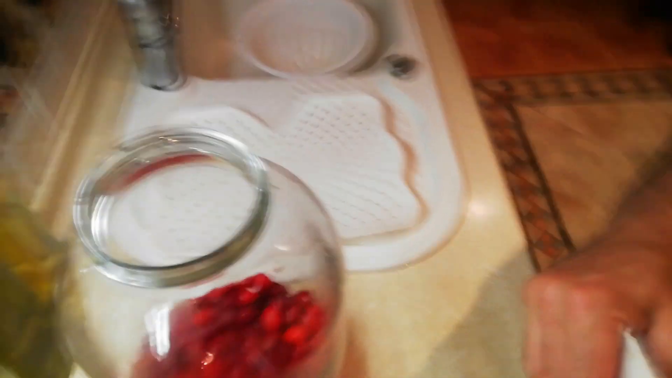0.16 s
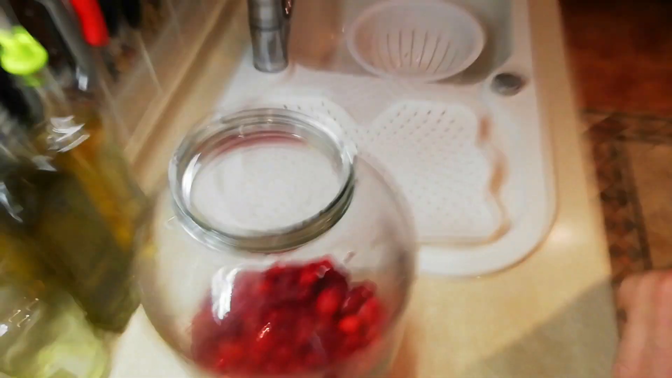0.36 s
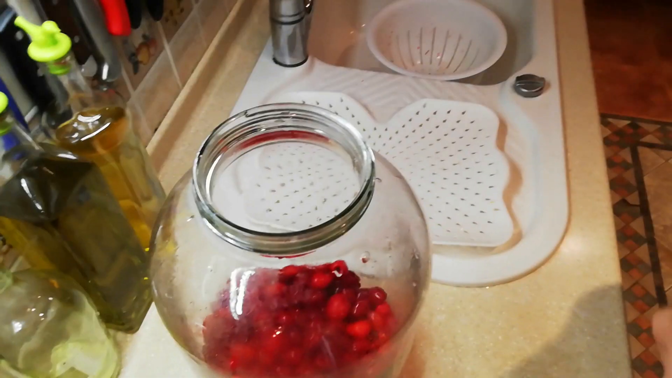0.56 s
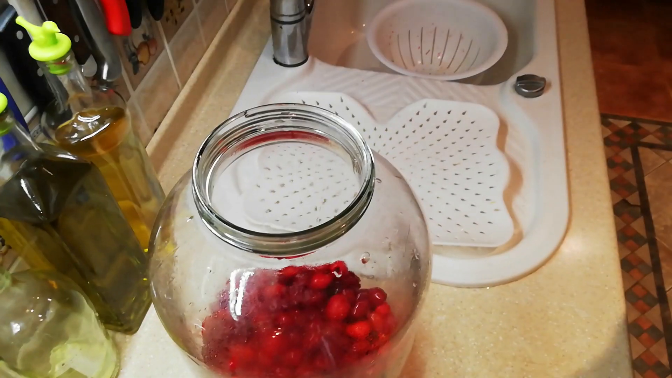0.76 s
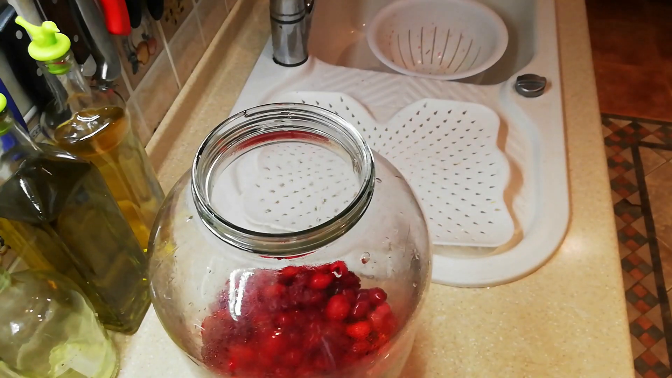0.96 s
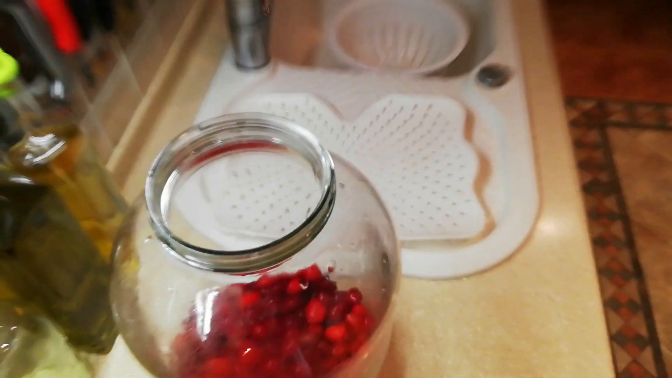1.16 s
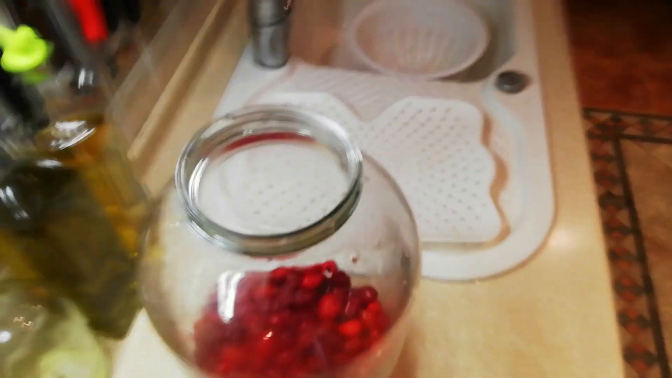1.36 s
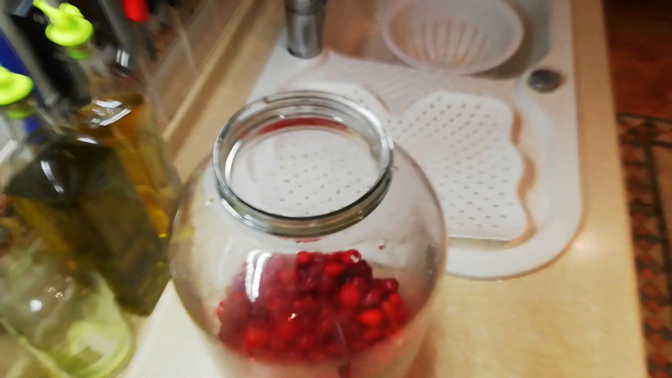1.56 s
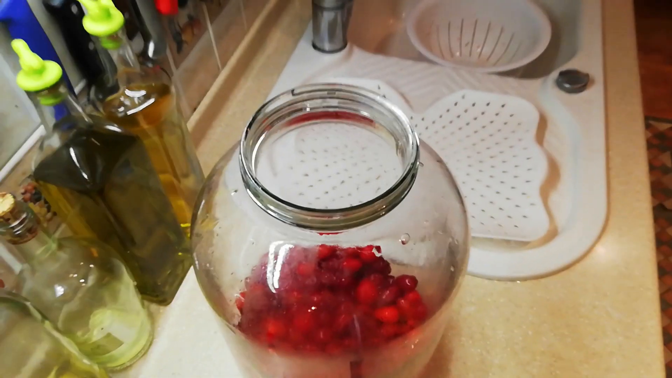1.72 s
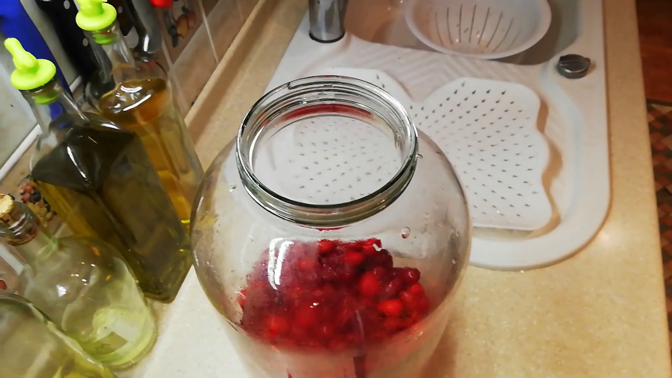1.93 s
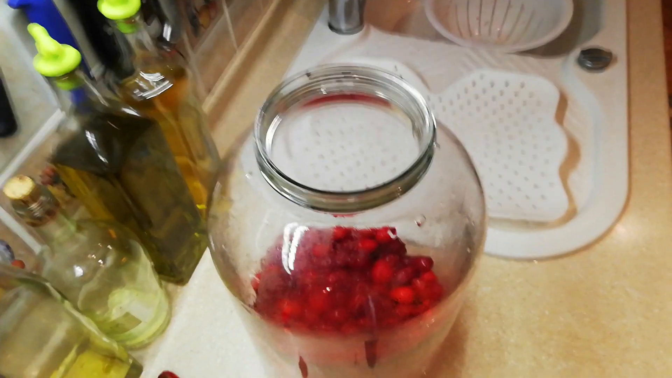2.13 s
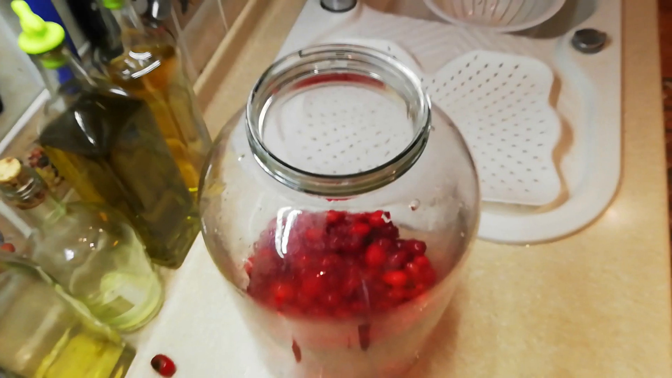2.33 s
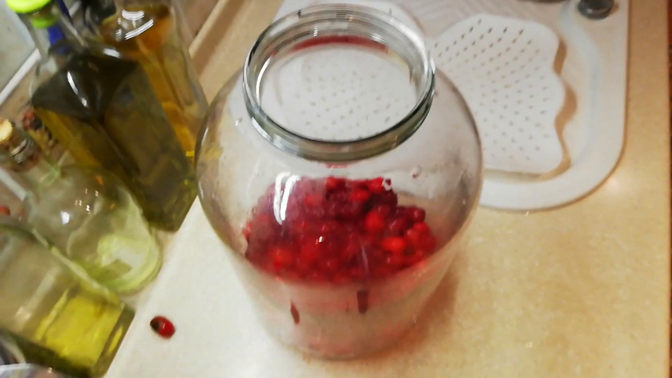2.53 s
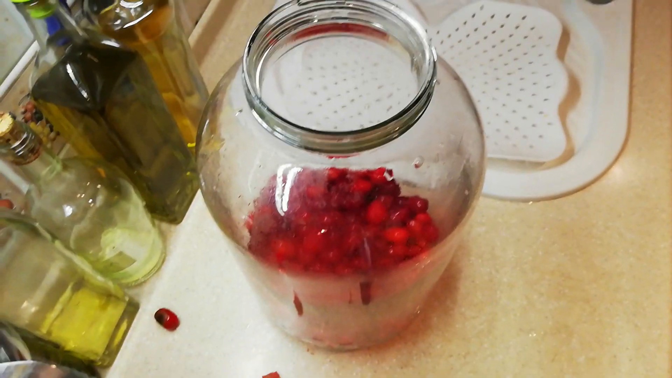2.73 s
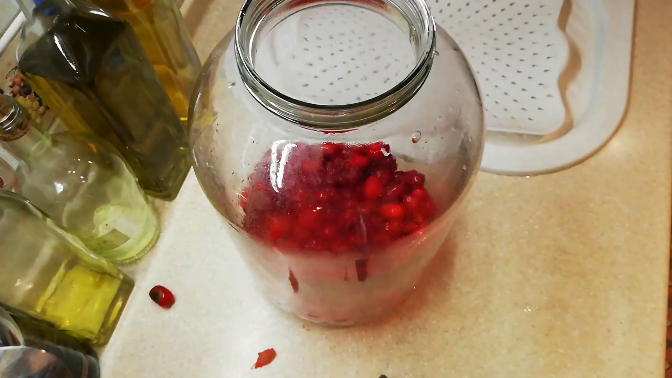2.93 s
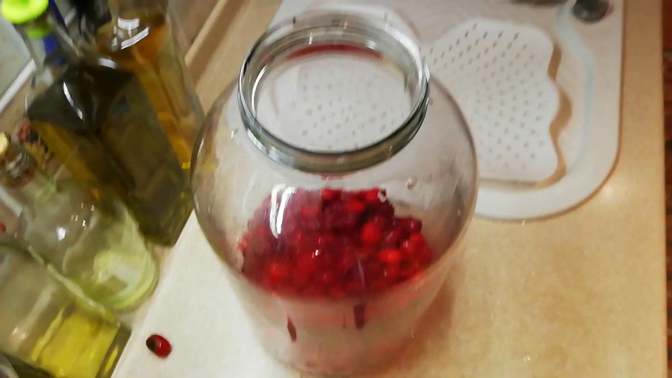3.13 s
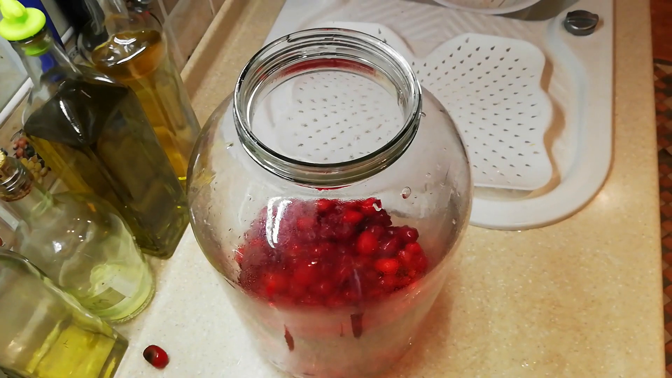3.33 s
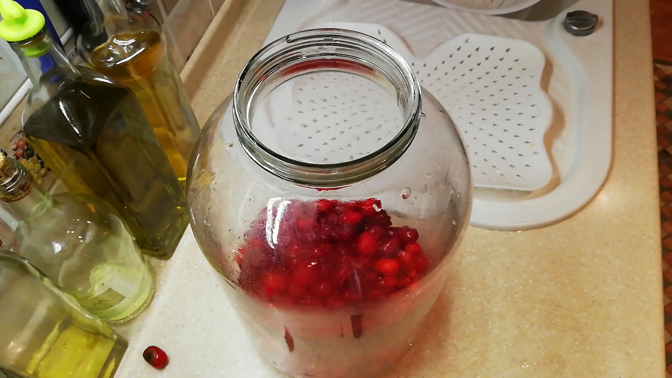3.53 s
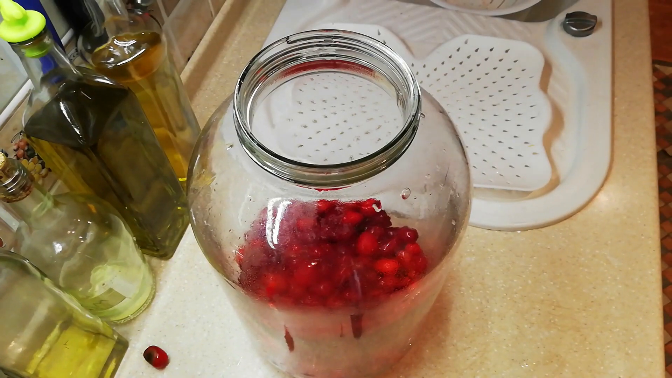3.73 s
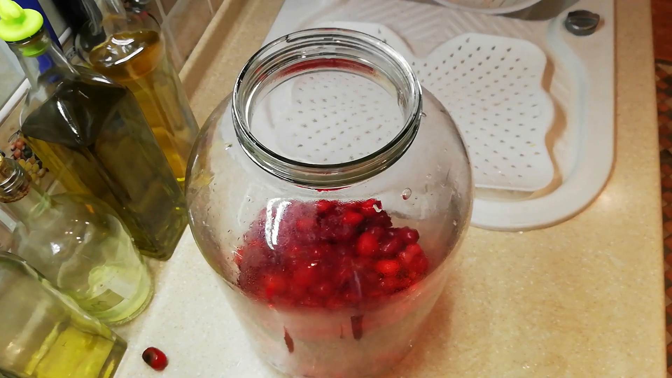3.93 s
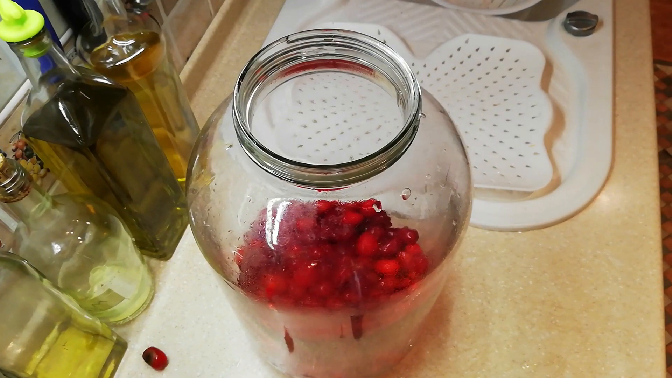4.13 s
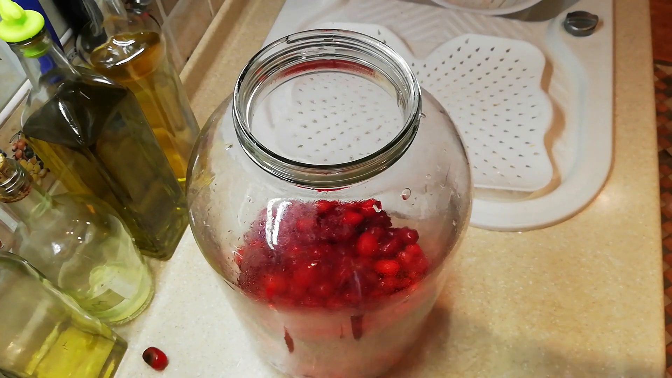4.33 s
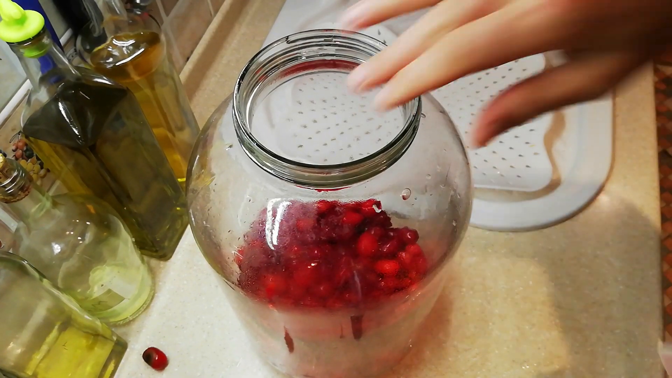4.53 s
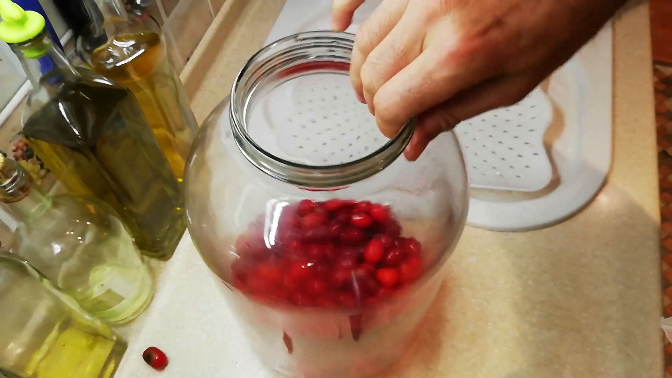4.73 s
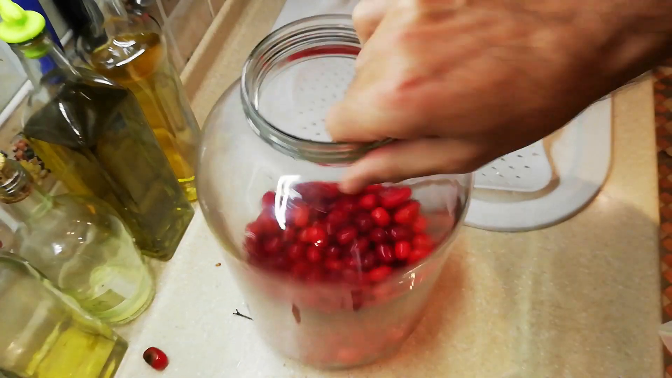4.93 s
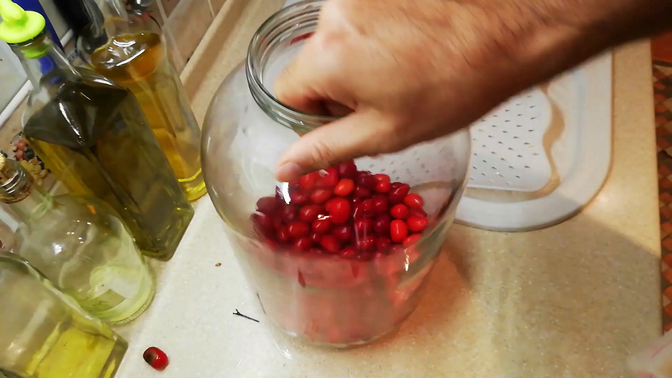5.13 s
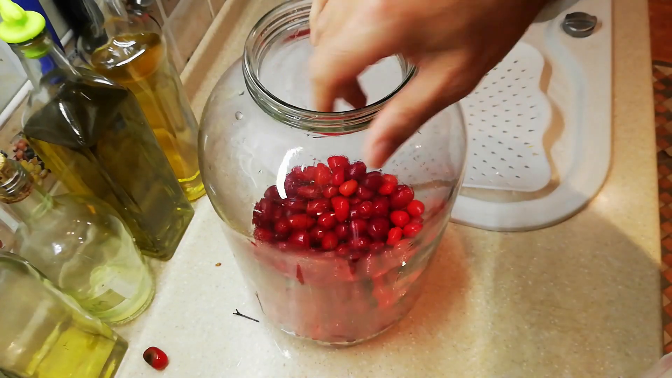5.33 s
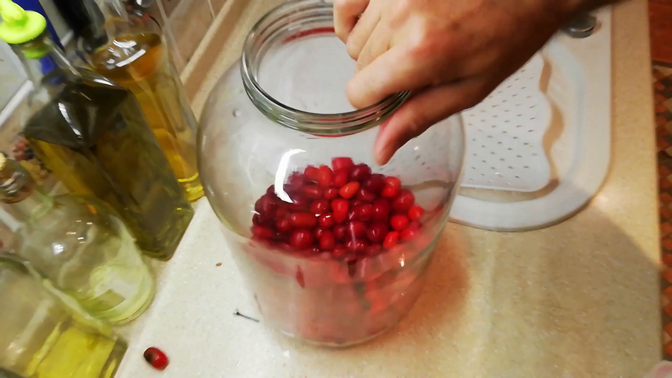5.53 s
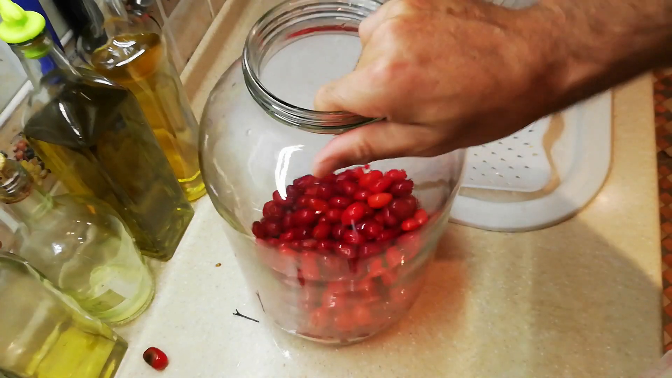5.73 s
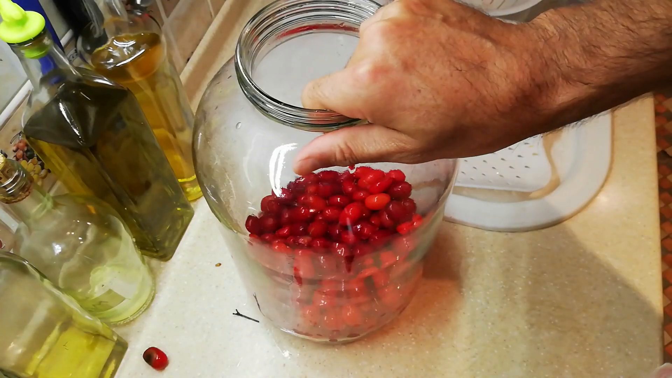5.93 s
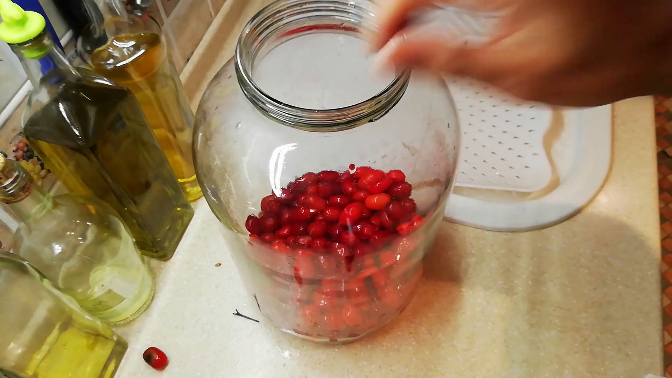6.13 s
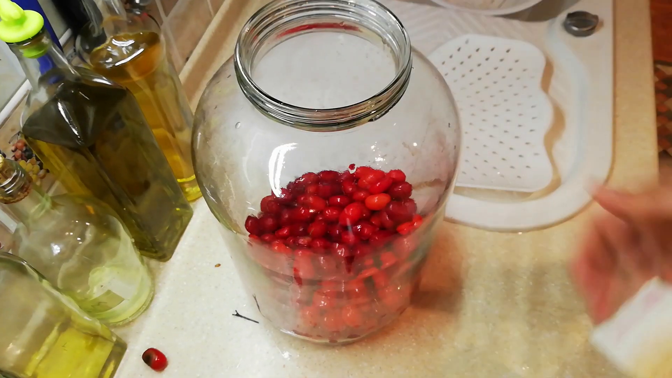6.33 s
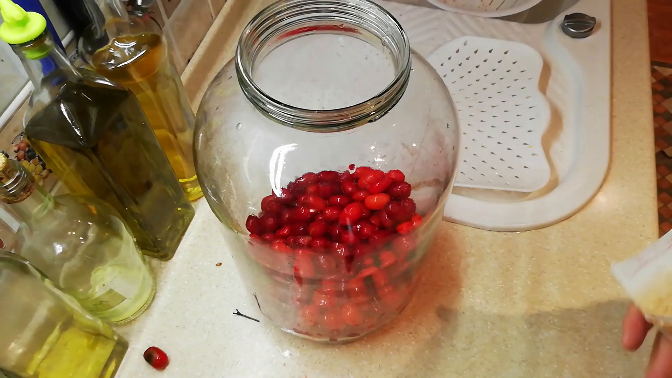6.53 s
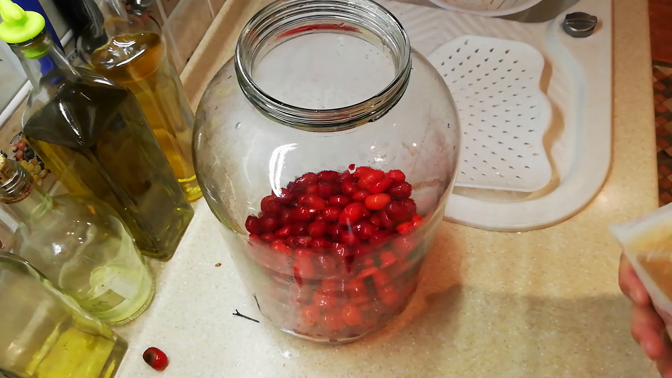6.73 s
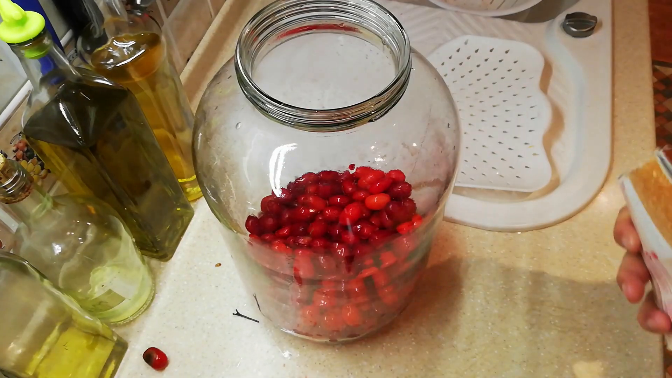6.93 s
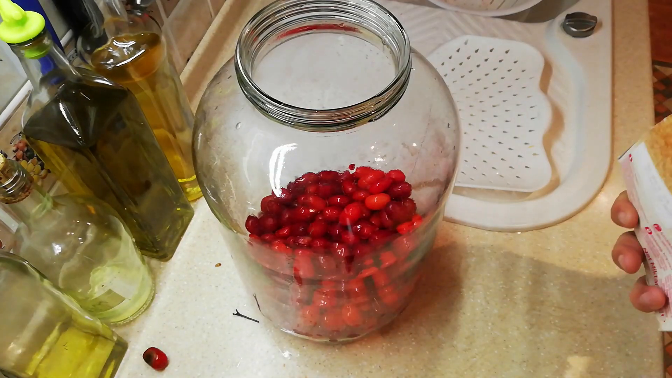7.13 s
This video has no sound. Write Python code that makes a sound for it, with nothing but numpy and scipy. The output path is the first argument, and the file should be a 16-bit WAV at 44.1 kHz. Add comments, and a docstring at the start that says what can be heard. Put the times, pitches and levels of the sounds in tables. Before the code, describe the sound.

For the first second and a half a paper package rustles softly, with a few crisp creases, while the grip ticks and rumbles right at the stereo microphone. Soft thumps follow, and a dish is bumped at 1.5 seconds and set down with a short ring at 1.8. Two sharp clacks come at 2.3 and 2.5, then a lull with faint knocks and rustles. From 4.6 a big glass jar slides over a gritty counter in a swelling scrape. Berries thud inside it at 4.8 and, loud and hollow, at 5.3. A shorter scrape with a tiny finger squeak leads to another strong thud at 5.8. Around 6.2 the glass chatters briefly to rest. From 6.5 to the end, near 7.4, the paper rustles and crackles again, louder. Everything is close, in a small kitchen with faint air and a distant motor hum.

```python
"""A big glass jar of berries, lifted and shaken to and fro above a kitchen counter, close to a hand-held
camera. The berries roll and grind over the glass, thud against its wall, and the glass chatters to rest. Before
that a paper package rustles, hard things clack and a dish is set down; at the end the paper rustles again. The
grip ticks and rumbles right at the stereo microphone; room air and a far motor lie behind."""
import sys
import numpy as np
from scipy import signal
from scipy.fft import rfft, irfft
from scipy.io import wavfile
from scipy.ndimage import uniform_filter1d

SR = 44100
rng = np.random.default_rng(int(sys.argv[2]) if len(sys.argv) > 2 else 0)


def master(y):
    """Save y as 16-bit WAV."""
    cut = np.clip(np.atleast_2d(y).T, -1, 1)
    pcm = np.round(cut * 32767)  # scale
    wavfile.write(sys.argv[1], SR, pcm.astype(np.int16))


N = 320362
TIME = np.arange(N) / SR
BASS, BODY, MIDDLE, TREBLE = (25, 300), (400, 2500), (900, 3000), (5000, 15000)  # bands in Hz
RUB_RISE_S, RUB_RELEASE_DB_PER_S = 0.026, 167

# Stereo width of diffuse sound. Each row: frequency in Hz, side against mid in dB.
WIDTH = [(60, -21), (150, -20.5), (280, -7.5), (500, -0.5), (15000, 2)]
# The lower part of a hand rubbing paper or glass. Each row: frequency in Hz, relative level in dB.
RUB_SPECTRUM = [(120, -31), (200, -16), (409, -14), (552, -11), (746, -9), (849, -7), (1260, -5),
                (1410, -5.5), (2470, -10), (4500, -7), (5850, -22), (9900, -120)]
# A dull thump. Each row: frequency in Hz, relative level in dB.
THUD_SPECTRUM = [(25, -54.5), (55, -11.5), (85, -1), (150, 1), (220, -3.5), (290, -5), (390, -5.5),
                 (540, -9.5), (760, -11), (1100, -15), (1850, -19.5), (2500, -33), (3600, -28.5),
                 (7000, -39), (10500, -32.5), (16000, -70.5)]
# Air and walls of the jar. Each row: frequency in Hz, relative level in dB, 60 dB decay in seconds.
JAR_MODES = [(113, -7, .35), (228, -7, .22), (325, -9, .3), (380, 5, .13), (432, -5, .18), (484, -11, .17),
             (624, -14, .22), (755, -6, .2), (1860, -23, .25)]
# The high ring of its glass. Each row: frequency in Hz, relative level in dB, 60 dB decay in seconds.
GLASS_MODES = [(1795, -6.5, 0.34), (2760, -5.5, 0.063), (3163, 2, 0.029), (3750, 1, 0.062),
               (4010, -3, 0.028), (4560, -2.5, 0.049), (5050, -1, 0.018), (5380, 1.5, 0.028),
               (5720, -5, 0.047), (7370, -11, .1), (9840, 1, 0.018), (10740, -7, 0.031)]
# Shakes of the jar. Each row: start and length in seconds, relative level at top speed in dB, # grit against
# body in dB.
SHAKES = [(4.569, 0.68, -34.5, -2.5), (5.575, 0.22, -39, -0.5)]


def amp(db):
    """Decibels to gain."""
    return 10 ** (np.asarray(db) / 20)


def read(points, hz):
    """A curve read on a log-frequency axis."""
    point_hz, value = np.transpose(points)
    return np.interp(np.log(hz + 1), np.log(point_hz + 1), value)


def add(mix, start, sound):
    """Mixes a sound in at a start time in seconds."""
    part = mix[..., max(round(start * SR), 0):][..., :sound.shape[-1]]
    part += sound[..., :part.shape[-1]]


def peaked(x, size=150):
    """Scales the loudest stretch of `size` samples to rms 1."""
    return x / np.sqrt(uniform_filter1d(x ** 2, size).max())


def evened(x, band=(0, SR)):
    """Scales to rms 1 within a band."""
    hz = np.fft.rfftfreq(len(x), 1 / SR)
    in_band = rfft(x)[(hz >= band[0]) & (hz < band[1])]
    return x * len(x) / np.sqrt(2 * np.sum(abs(in_band) ** 2))


def colour(x, spectrum, size=4096):
    """Minimum-phase filter with the given spectrum."""
    hz = abs(np.fft.fftfreq(size, 1 / SR))
    log_gain = np.log(amp(np.maximum(read(spectrum, hz), -100)))
    taps = np.fft.ifft(np.exp(np.conj(signal.hilbert(log_gain)))).real[:size // 2]
    return signal.oaconvolve(x, taps)[:len(x)]


def soften(x, edge_hz):
    """A softer contact loses its treble."""
    return signal.lfilter(*signal.butter(2, min(edge_hz, SR / 2 - 1), fs=SR), x)


def grains(count, per_s, spread_db):
    """Random tiny impacts, a few larger than the rest."""
    size = amp(spread_db * np.minimum(rng.exponential(1, count), 4))
    return size * rng.choice([-1, 1], count) * (rng.random(count) < per_s / SR)


def burst(fade_s, scatter, count=4096):
    """One impulse followed by a dying scatter of smaller ones."""
    trail = rng.standard_normal(count) * np.exp(-np.arange(count) / SR / fade_s)
    return signal.unit_impulse(count) + scatter * trail / np.linalg.norm(trail)


def ring(drive, modes):
    """What a body with these modes gives back, at the power of its drive."""
    t = np.arange(SR // 2) / SR
    tone = sum(amp(db - 60 * t / t60) * np.sin(2 * np.pi * (hz * t + rng.random()))
               for hz, db, t60 in modes)
    ringing = signal.oaconvolve(drive, tone)[:len(drive)]
    return ringing * drive.std() / ringing.std()


def panned(x, pan_db, shadow_hz=350):
    """Places a sound by left minus right in dB; the bass reaches both microphone ports alike."""
    upper = signal.lfilter(*signal.butter(1, shadow_hz, "high", fs=SR), x)
    return x + upper * (amp([[pan_db / 2], [-pan_db / 2]]) - 1)


def diffuse(mid, side):
    """Sound from all around: alike at both ports in the bass, unrelated in the treble."""
    width = amp(read(WIDTH, np.fft.rfftfreq(len(mid), 1 / SR)))
    left_right = rfft(mid) + np.array([[1], [-1]]) * width * rfft(side)
    return irfft(left_right / np.sqrt(1 + width ** 2), len(mid))


def friction(spectrum, band, per_s, spread_db):
    """Dense coloured grains spread over both ports, rms 1 within the band."""
    return diffuse(*(evened(colour(grains(N, per_s, spread_db), spectrum), band) for _ in range(2)))


def wander(x, patchy_db, patch_frames=16, patch_bins=5):
    """The colour of a rubbing contact shifts as it moves over the surface."""
    spectra = signal.stft(x, nperseg=512)[2]
    patches = uniform_filter1d(rng.standard_normal(spectra.shape[1:]), patch_bins, 0)
    patches = uniform_filter1d(patches, patch_frames, 1)
    shifted = signal.istft(spectra * amp(patchy_db * patches / patches.std()), nperseg=512)[1][:, :N]
    return shifted * x.std() / shifted.std()


def stroke(start, length, rise_s, release_db_per_s):
    """Gain of one hand movement: attack, hold, release."""
    t = np.maximum(TIME - start, 0)
    return np.minimum(t / rise_s, 1) * amp(-release_db_per_s * np.maximum(t - length, 0))


def kitchen(x, near_db, tail_db, near_s=0.0049, count=20000):
    """Direct sound, quick reflections off counter and tiles, and the tail of the room."""
    # Reverberation of the room. Each row: frequency in Hz, 60 dB decay in seconds.
    decay_times = [(150, 0.53), (400, 0.4), (1000, 0.32), (3000, 0.4), (8000, 0.33), (15000, 0.19)]
    t = np.arange(count) / SR
    near = rng.standard_normal((2, count)) * np.exp(-t / near_s) * (t > .0007)
    hz, frame_s, spectra = signal.stft(rng.standard_normal((2, count)) * (t > .006), SR, nperseg=256)
    decay = amp(-60 * frame_s / read(decay_times, hz)[:, None])
    tail = signal.istft(spectra * decay, SR, nperseg=256)[1][:, :count]
    echo = amp(near_db) * near / np.linalg.norm(near[0]) + amp(tail_db) * tail / np.linalg.norm(tail[0])
    return x + signal.fftconvolve(np.atleast_2d(x), diffuse(*echo), axes=1)[:, :N]


def room_tone(air_db=-54.5):
    """Quiet air all around and the hum of a far motor."""
    # Room air. Each row: frequency in Hz, relative level in dB.
    air_spectrum = [(12, -34.5), (20, 2.5), (67, -1), (154, -17.5), (228, -30.5), (328, -12), (377, -19.5),
                    (624, -24), (1120, -20), (2320, -31), (4540, -32), (7310, -34), (9950, -31.5),
                    (16000, -47.5)]
    # The motor's tones. Each row: frequency in Hz, level in dB.
    motor_tones = [(328.4, -75.5), (1055, -84), (2552, -94)]
    air = diffuse(*(evened(colour(noise, air_spectrum)) for noise in rng.standard_normal((2, N))))
    hum = sum(amp(db) * np.sqrt(2) * np.sin(2 * np.pi * hz * TIME) for hz, db in motor_tones)
    return amp(air_db) * air + hum


def handling(resting_db=-61.5):
    """Hands rumble on the camera and the counter, faintly even at rest."""
    # Handling rumble. Each row: frequency in Hz, relative level in dB.
    spectrum = [(12, -32.5), (20, -7), (87, 1.5), (156, -9), (215, -5), (286, -19), (325, -11.5),
                (687, -32), (900, -21), (1170, -37), (1980, -120)]
    # The hands shift. Each row: start and length in seconds, level in dB.
    shifts = [(0.15, 0.15, -45), (0.252, 0.31, -37.5), (0.897, 0.11, -49.5), (1.176, 0.11, -38.5),
              (1.652, 0.23, -47.5), (4.307, 0.146, -48), (4.695, 0.46, -43.5), (6.139, 0.17, -34.5),
              (7.217, 0.06, -38.5)]
    moving = sum(amp(db) * stroke(start, length, rise_s=0.032, release_db_per_s=118.5)
                 for start, length, db in shifts)
    return friction(spectrum, BASS, per_s=270, spread_db=0.5) * np.hypot(moving, amp(resting_db))


def tick(hz, ring_q=2.7):
    """A few cycles of one small resonance."""
    click = burst(fade_s=.0007, scatter=1.6)
    return peaked(signal.lfilter(*signal.iirpeak(hz, ring_q, SR), click))


def grip(tick_db=-1, creak_ticks_per_s=20, creak_scatter_db=3):
    """The plastic grip ticks right by the microphone and creaks in uneven flurries as it tightens."""
    # Single ticks. Each row: time in seconds, relative peak in dB, centre in Hz, left minus right in dB.
    ticks = [(0.3813, -21, 8650, 7.5), (0.404, -29.5, 10500, 16), (0.4637, -35, 10100, 14),
             (0.5483, -37, 10400, 16), (1.281, -19.5, 9300, -3), (1.9462, -33.5, 4500, -1.5),
             (2.0997, -32.5, 9700, -4.5), (2.2877, -19, 7660, -0.5), (2.327, -30.5, 10630, 31.5),
             (2.4324, -33.5, 7000, 4.5), (2.6239, -24.5, 8200, 1), (2.713, -45, 3330, 0.5),
             (2.9361, -38.5, 6430, 1), (3.1999, -36.5, 9400, 7)]
    # Flurries. Each row: start and length in seconds, typical peak in dB.
    creaks = [(0.318, 0.29, -42), (3.235, 0.15, -49)]
    out = np.zeros((2, N))
    for start, db, hz, pan_db in ticks:
        add(out, start, panned(amp(db + tick_db) * tick(hz), pan_db))
    for start, length, db in creaks:
        for due in np.arange(start, start + length, 1 / creak_ticks_per_s):
            jitter_s = (rng.random() - .5) / creak_ticks_per_s
            size = amp(db + creak_scatter_db * rng.standard_normal())
            add(out, due + jitter_s, panned(size * tick(hz=9300), pan_db=10.5))
    return kitchen(out, near_db=-5.5, tail_db=-11.5)


def clacks(body_hz=2200, rattle_s=0.02):
    """Hard things meet: a sharp contact, then a short dense rattle of the struck parts."""
    # Each row: time in seconds, peak in dB, body against click in dB, relative rattle level in dB.
    hits = [(2.315, -16.5, 3.5, -2.5), (2.3175, -9.5, 10.5, -24), (2.520, -15.5, 0, -5.5),
            (2.532, -23.5, -8, -3), (3.421, -36, 19.5, -25), (4.085, -37.5, 16, 11), (4.152, -37, 26, 1)]
    # One clack. Each row: frequency in Hz, relative level in dB.
    spectrum = [(59, -51), (100, -16.5), (289, -10), (471, -24), (721, -13), (1230, -12.5), (1550, -12),
                (1910, -11.5), (2800, -16.5), (3540, -2.5), (5300, -8), (7940, 1.5), (8640, 0.5),
                (10700, 0.5), (16000, -24.5)]
    out = np.zeros(N)
    for start, db, body_db, rattle_db in hits:
        contact = burst(fade_s=0.0018, scatter=2.9, count=12000)
        rattle = burst(fade_s=rattle_s, scatter=4 * amp(rattle_db), count=12000)
        blow = colour(contact + rattle, spectrum)
        add(out, start, amp(db) * peaked(blow + (amp(body_db) - 1) * soften(blow, body_hz)))
    return kitchen(out, near_db=-11.0, tail_db=-15)


def dish(blow_db=-3.5, ring_db=-6, touch_gap_s=0.0068, first_touch_db=-3, first_edge_ratio=0.77):
    """A dish is bumped and set down: quick touches ring it, firmer and harder as the rim settles."""
    # Landings. Each row: start and length in seconds, relative peak in dB, treble edge in Hz.
    landings = [(1.465, 0.0045, -28.5, 2800), (1.823, 0.0307, -18.5, 4500), (2.145, 0.018, -30, 995)]
    # One touch of the rim. Each row: frequency in Hz, relative level in dB.
    spectrum = [(350, -33.5), (520, -24.5), (700, -11.5), (800, -5), (1250, -10.5), (1650, -9.5),
                (2200, -18), (2700, -22), (3400, -14), (5400, -25.5), (9700, -15.5), (14000, -19.5)]
    # The dish's ring. Each row: frequency in Hz, relative level in dB, 60 dB decay in seconds.
    modes = [(826, -24, 0.26), (1043, -23, 0.55), (1250, 19.5, 0.16), (1620, -8, 0.69), (2300, 27, 0.21),
             (2401, -4, 0.27), (2573, -12.5, 0.22), (2837, -27, 0.76), (2966, -16.5, 0.36),
             (3150, -21, 0.27), (3600, -18, 0.42), (4565, -20, 0.51), (5986, -22, 0.27)]
    blows = np.zeros(N)
    for start, length, db, edge_hz in landings:
        for t in np.arange(0, length, touch_gap_s):
            loose = (1 - t / length) ** 2
            touch = colour(burst(fade_s=0.003, scatter=1.1), spectrum)
            touch = soften(touch, edge_hz * first_edge_ratio ** loose)
            add(blows, start + t, amp(db + first_touch_db * loose) * peaked(touch))
    ringing = amp(ring_db) * diffuse(ring(blows, modes), ring(blows, modes))
    return panned(kitchen(amp(blow_db) * blows, near_db=4.5, tail_db=6.5) + ringing, pan_db=4)


def paper(fizz_db=0.5, body_db=-1, crease_db=-2, small_crease_db=-12):
    """The package's fibres catch and slip as dense grains; now and then a crease snaps through."""
    # Hand strokes. Each row: start and length in seconds, relative level in dB, body against fizz in dB.
    rubs = [(0.0, 0.13, -47, -10.5), (0.13, 0.14, -44, -15), (0.26, 0.075, -37.5, -6),
            (0.422, 0.096, -48.5, 0), (0.6, 0.28, -56.5, -4), (0.898, 0.15, -44, -5),
            (0.99, 0.35, -48, -14.5), (1.189, 0.2, -46.5, -3), (1.5, 0.26, -63.5, 2.5),
            (2.195, 0.01, -63, -5.5), (2.47, 0.018, -48.5, -3.5), (3.188, 0.48, -62, -7),
            (4.003, 0.13, -46, -9.5), (4.056, 0.25, -54, -3.5), (6.51, 0.068, -43.5, -3),
            (6.63, 0.17, -47.5, -10), (6.775, 0.082, -38, -1), (6.928, 0.04, -33.5, -3.5),
            (6.966, 0.068, -27.5, -8.5), (7.072, 0.31, -36, -8)]
    # Slipping fibres. Each row: frequency in Hz, relative level in dB.
    fizz_spectrum = [(1760, -49), (3000, -4), (3610, -23.5), (5350, 1.5), (5990, 2.5), (6530, -1),
                     (10300, 6), (12400, -8.5), (15100, -10), (16100, -34), (16500, -53)]
    # The loudest creases. Each row: time in seconds, relative peak in dB.
    creases = [(0.2735, -31), (0.9922, -25), (1.1917, -23), (1.468, -27), (1.66, -38.5), (1.9828, -32),
               (2.1957, -31), (4.2944, -36), (6.5165, -36), (6.7138, -31), (6.7672, -30), (6.8407, -18),
               (6.926, -24.5), (7.1309, -26), (7.1565, -22.5), (7.22, -20)]
    # One snap. Each row: frequency in Hz, relative level in dB.
    snap_spectrum = [(180, -38), (300, -4), (528, -14), (1170, -5.5), (2320, -8.5), (3520, 0.5), (5250, -4),
                     (9880, 0), (14200, -19), (16000, -26)]
    fizz_gain, body_gain = np.zeros(N), np.zeros(N)
    for start, length, db, low_db in rubs:
        gain = amp(db) * stroke(start, length, RUB_RISE_S, RUB_RELEASE_DB_PER_S)
        fizz_gain = np.hypot(fizz_gain, gain)
        body_gain = np.hypot(body_gain, gain * amp(low_db))
    fizz = amp(fizz_db) * friction(fizz_spectrum, TREBLE, per_s=7800, spread_db=6.0)
    body = amp(body_db) * friction(RUB_SPECTRUM, MIDDLE, per_s=2500, spread_db=3.5)
    sliding = wander(fizz * fizz_gain + body * body_gain, patchy_db=3.5)
    small_creases = evened(colour(grains(N, per_s=17, spread_db=2.0), snap_spectrum))
    snaps = amp(small_crease_db) * fizz_gain * small_creases
    for start, db in creases:
        snap = colour(burst(fade_s=.002, scatter=1.8), snap_spectrum)
        add(snaps, start, amp(db + crease_db) * peaked(snap))
    return kitchen(sliding, near_db=-10.5, tail_db=-6.5) + kitchen(snaps, near_db=0, tail_db=-4.5)


def grab(start_s=4.545, length_s=0.18, level_db=-54, ring_db=2):
    """Fingers brush the neck of the jar as the hand takes hold."""
    skin = friction(RUB_SPECTRUM, MIDDLE, per_s=5000, spread_db=1.0)
    rub = soften(skin + amp(ring_db) * ring(skin.mean(0), GLASS_MODES), edge_hz=2900)
    return amp(level_db) * rub / rub.std() * stroke(start_s, length_s, RUB_RISE_S, RUB_RELEASE_DB_PER_S)


def squeak():
    """A finger sticks and slips on the jar's rim: a short, unsteady falling tone."""
    # The glide. Each row: time in seconds, pitch in Hz, level in dB.
    glide = [(5.598, 2050, -52), (5.607, 1900, -45.5), (5.627, 1490, -62)]
    times, hz, db = np.transpose(glide)
    pitch = np.interp(TIME, times, hz) * (1 + .5 * rng.standard_normal(N))
    gain = amp(np.interp(TIME, times, db, left=-120, right=-120))
    return gain * np.sqrt(2) * np.sin(2 * np.pi * np.cumsum(pitch) / SR)


def chatter(start_s=6.155, gap_s=0.0232, first_db=-36.5, loss_db=0.4, glass_db=-6, bump_db=4):
    """The jar rocks to rest: eight slowly weakening touches ping the glass and bump the counter."""
    touches, at_s = np.zeros(N), start_s
    for k in range(8):
        db = first_db - loss_db * k + 0.2 * rng.standard_normal()
        add(touches, at_s, amp(db) * peaked(burst(fade_s=0.0042, scatter=1.15)))
        at_s += gap_s * rng.uniform(.8, 1.2)
    bumps = soften(colour(touches, THUD_SPECTRUM), edge_hz=2200)
    bumps *= amp(bump_db) * touches.std() / bumps.std()
    pings = amp(glass_db) * ring(touches, GLASS_MODES)
    return kitchen(pings, near_db=3.5, tail_db=-2) + kitchen(bumps, near_db=0.5, tail_db=-8)


def thuds(blow_db=-2, jar_db=15, count=14000):
    """Thumps on the counter, then berries in the jar: many soft impacts land almost at once."""
    # Each row: start in seconds, relative peak in dB, settling time in seconds, treble edge in Hz.
    thumps = [(1.193, -45, 0.019, 342), (1.275, -36, 0.015, 2500), (1.462, -25.5, 0.018, 333),
              (1.657, -37, 0.016, 500), (2.316, -35.5, 0.016, 260), (4.761, -21.5, 0.015, 1700),
              (4.794, -33, 0.0085, 324), (5.282, -12.5, 0.0267, 8100), (5.625, -37, 0.0756, 940),
              (5.768, -13, 0.024, 3330), (6.147, -39.5, 0.014, 1200)]
    blows, shoves = np.zeros(N), np.zeros(N)
    t = np.arange(count) / SR
    for start, db, settle_s, edge_hz in thumps:
        settling = (1 + 2 * t / settle_s) * np.exp(-2 * t / settle_s)
        impacts = colour(grains(count, per_s=2500, spread_db=0.83) * settling, THUD_SPECTRUM)
        add(blows, start, amp(db) * peaked(soften(impacts, edge_hz), size=400))
        if start > SHAKES[0][0]:  # once the jar moves, the shove of the whole heap rings it
            shove = peaked(soften(signal.unit_impulse(count), edge_hz), size=20)
            add(shoves, start + settle_s / 10, amp(db + jar_db) * shove)
    return kitchen(amp(blow_db) * blows, near_db=-3.5, tail_db=-4.5) + ring(shoves, JAR_MODES)


def push(start, length, top_speed_at=0.77, start_db=-31, end_db=-7.5, stop_db_per_s=250):
    """Gain of the grinding, 1 at top speed, as the jar gathers speed, brakes and stops."""
    progress = np.clip((TIME - start) / length, 0, 1)
    gather = np.maximum(1 - progress / top_speed_at, 0)
    brake = np.maximum((progress - top_speed_at) / (1 - top_speed_at), 0)
    stopped_s = np.maximum(TIME - start - length, 0)
    return (TIME > start) * amp(start_db * gather ** 2 + end_db * brake ** 2 - stop_db_per_s * stopped_s)


def shake(level_db=-1, grit_exponent=1.08, jar_db=-7, glass_db=-11):
    """Berries roll and grind over the glass as the jar is shaken; the hollow and the wall of the jar hum along."""
    # The low grinding. Each row: frequency in Hz, relative level in dB.
    body_spectrum = [(40, -40), (80, -0.5), (190, 3.5), (280, -1.5), (440, 2), (530, -9.5), (620, -1),
                     (1000, -5.5), (1450, -9.5), (1870, -7.5), (2400, -16), (3300, -15), (3700, -12),
                     (4100, -15.5), (6000, -37)]
    # The bright rasp. Each row: frequency in Hz, relative level in dB.
    grit_spectrum = [(2060, -41), (3500, -5), (4240, -3), (5000, 7.5), (6490, 3), (10100, 8), (15000, -16),
                     (15700, -40.5), (16000, -93)]
    body_gain = sum(amp(db + level_db) * push(start, length) for start, length, db, _ in SHAKES)
    grit_gain = sum(amp(db + grit_db + level_db) * push(start, length) ** grit_exponent
                    for start, length, db, grit_db in SHAKES)
    body = wander(friction(body_spectrum, BODY, per_s=7000, spread_db=3.5), patchy_db=1.0) * body_gain
    grit = friction(grit_spectrum, TREBLE, per_s=12000, spread_db=6.0) * grit_gain
    hollow = amp(jar_db) * ring(body.mean(0), JAR_MODES)
    wall = amp(glass_db) * ring((body + grit).mean(0), GLASS_MODES)
    return kitchen(body + grit + squeak(), near_db=-6.0, tail_db=-5.5) + hollow + wall


def scene():
    """The counter from the microphone: the jar a little to the left, the package near the middle."""
    jar = panned(grab() + thuds() + shake() + chatter(), pan_db=1.5)
    package = panned(paper(), pan_db=-0.4)
    return package + grip() + clacks() + dish() + jar + room_tone() + handling()


def record(dry, port_turn_rad=1.37, overload=0.9, edge_hz=16100):
    """The two microphone ports differ in colour and, above the bass, in phase; then clip and low-pass."""
    # Imbalance of the ports. Each row: frequency in Hz, left minus right in dB.
    imbalance = [(100, 0), (350, -1.5), (600, 0.5), (850, 0.5), (1400, 0.5), (2000, -4.5), (2600, -6),
                 (3500, -3.5), (6500, -2), (8700, -4), (10400, 7.5), (12000, 2.5), (15000, -1.5)]
    hz = np.fft.rfftfreq(N, 1 / SR)
    port = amp(read(imbalance, hz) / 2) * np.exp(.5j * port_turn_rad * amp(read(WIDTH, hz)))
    heard = irfft(rfft(dry) * np.array([port, 1 / port]), N)
    heard = np.clip(heard, -overload, overload)
    low_pass = signal.firwin(301, edge_hz, window=("kaiser", 9), fs=SR)
    return signal.oaconvolve(heard, low_pass[None], "same")


dry = scene()
out = record(dry)
master(out)
```